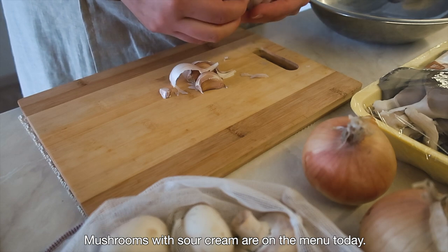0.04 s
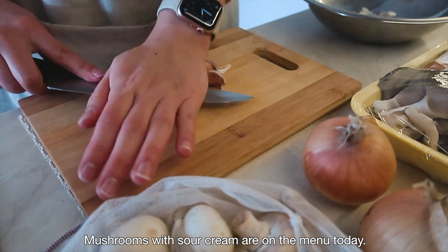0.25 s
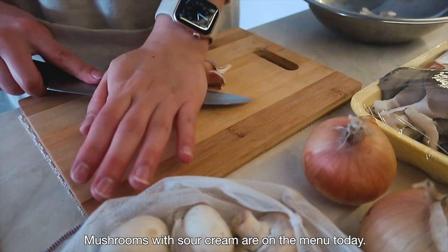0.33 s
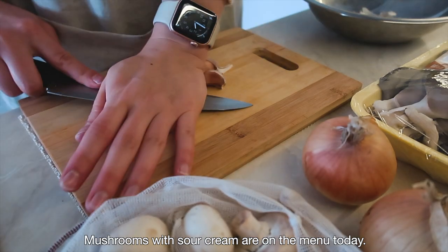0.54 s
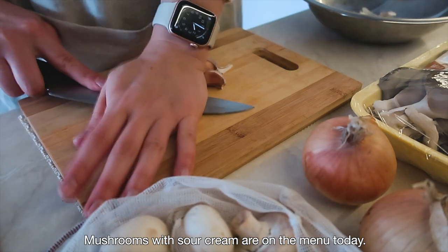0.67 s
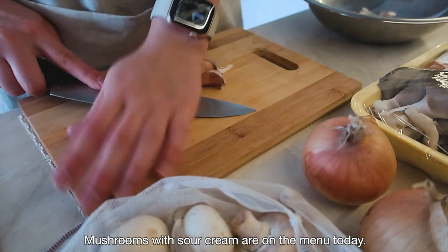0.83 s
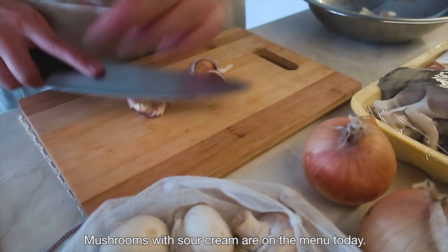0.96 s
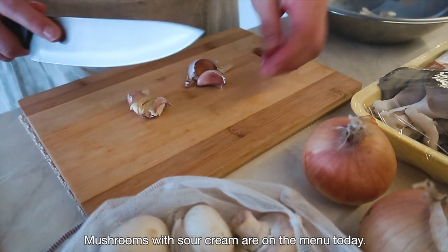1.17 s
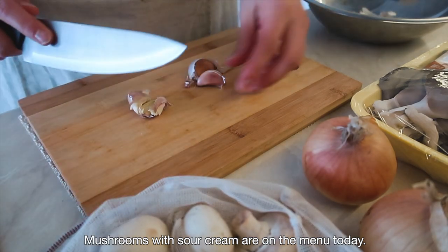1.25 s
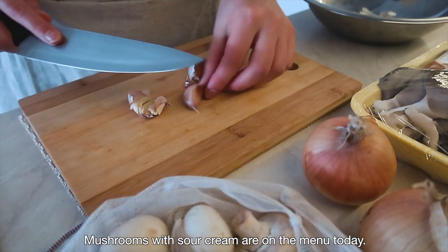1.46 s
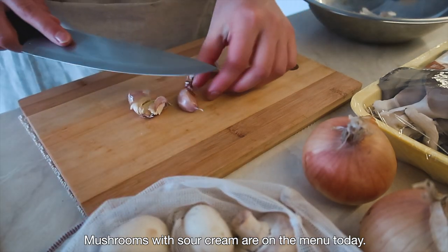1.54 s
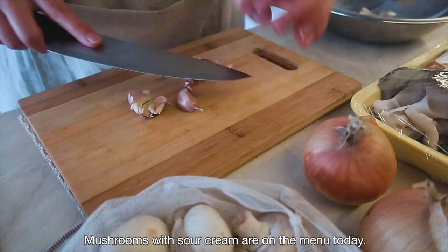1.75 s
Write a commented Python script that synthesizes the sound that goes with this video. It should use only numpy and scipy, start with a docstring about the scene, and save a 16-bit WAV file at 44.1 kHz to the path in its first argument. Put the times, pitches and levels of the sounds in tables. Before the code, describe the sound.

A knife crushes a garlic clove on a wooden board, its dry skin snapping.

```python
"""A low hum in a quiet kitchen, cut by one short dropout; a knife meets a garlic clove with a soft knock.
The hand leans on the flat of the blade and the dry skin crackles and snaps, each snap exciting the wooden
board. The clove gives way and the blade slaps down: the board rings and the counter thuds beneath it.
Later the next clove slides over the board, tiny slips rubbing the resonances of the wood."""
import sys
import numpy as np
from scipy import signal
from scipy.fft import rfft, irfft
from scipy.io import wavfile
from scipy.ndimage import uniform_filter1d, map_coordinates

SR = 44100
rng = np.random.default_rng(int(sys.argv[2]) if len(sys.argv) > 2 else 0)


def wav_out(sig):
    """Save sig, one row per channel (or a flat mono array), as 16-bit PCM at SR to the path in sys.argv[1]."""
    wavfile.write(sys.argv[1], SR, np.round(np.clip(np.atleast_2d(sig).T, -1, 1) * 32767).astype(np.int16))


N = 79380
TIME = np.arange(N) / SR


def amp(db):
    """Decibels to gain."""
    return 10 ** (np.asarray(db) / 20)


def fade(t, t60):
    """A decay that falls 60 dB in t60 seconds."""
    return amp(-60 * t / t60)


def unit_rms(x):
    """Scales to rms 1."""
    return x / np.sqrt(np.mean(x ** 2) + 1e-20)


def unit_energy(x):
    """Scales to energy 1."""
    return x / np.sqrt(np.sum(x ** 2) + 1e-20)


def curve_at(points, hz):
    """Reads a curve over log frequency."""
    f, value = np.transpose(points)
    return np.interp(np.log(hz + 1), np.log(f), value)


def automation(points):
    """Draws straight ramps between points in time."""
    return np.interp(TIME, *np.transpose(points))


def add(mix, start_s, sound):
    """Lays a sound into the mix."""
    part = mix[round(start_s * SR):][:len(sound)]
    part += sound[:len(part)]


def through(x, response):
    """Passes a sound through an impulse response."""
    return signal.fftconvolve(x, response)[:len(x)]


def low_cut(x, hz, order):
    """Rolls off the bass."""
    return signal.sosfilt(signal.butter(order, hz, "high", fs=SR, output="sos"), x)


def stereo(spectra, correlation):
    """Blends two unrelated spectra into a left and right of the given correlation."""
    (a, b), same = spectra, np.clip(correlation, -1, 1)
    return np.array([a, same * a + np.sqrt(1 - same ** 2) * b])


def click(eq, pitch=1, size=2048):
    """A sharp minimum-phase click coloured by an EQ curve."""
    hz = abs(np.fft.fftfreq(size, 1 / SR))
    log_gain = np.log(amp(curve_at(eq, hz / pitch)))
    spectrum = np.exp(np.conj(signal.hilbert(log_gain)))
    return unit_energy(np.fft.ifft(spectrum).real)


def ring(modes, pitch=1):
    """The dying modes of a struck body."""
    t = TIME[:SR // 2]
    partials = (amp(db) * fade(t, t60) * np.sin(2 * np.pi * hz * pitch * t) for hz, db, t60 in modes)
    return unit_energy(sum(partials))


def grains(per_s, spread_db=4.3):
    """Random tiny impulses, a few of them large."""
    size = amp(spread_db * np.minimum(rng.exponential(1, N), 4))
    return unit_rms(size * rng.choice([-1, 1], N) * (rng.random(N) < per_s / SR))


# colour of the room tone: freq_hz, gain_db
ROOM_TONE_EQ = [(20, -10), (45, -1.5), (70, -5), (130, 2.5), (170, -7.5), (220, -3), (400, -9), (1000, -14),
                (2000, -19.5), (4000, -25), (8000, -34.5), (12000, -42), (15000, -50)]
# stereo image of the room tone: freq_hz, correlation
ROOM_TONE_IMAGE = [(60, 0.4), (130, 1), (290, 0.05), (630, 0), (3000, -.15), (15000, -.1)]

def room_tone(level_db=-62):
    """A soft, dark bed of noise, wide in the treble."""
    hz = np.fft.rfftfreq(N, 1 / SR)
    noise = stereo(rfft(rng.standard_normal((2, N))), curve_at(ROOM_TONE_IMAGE, hz))
    return amp(level_db) * unit_rms(irfft(noise * amp(curve_at(ROOM_TONE_EQ, hz)), N))


# drift of the hum: time_s, pitch_hz, level_db
HUM_DRIFT = [(0, 72, -51.5), (.2, 72, -53), (.35, 71.5, -52), (0.602, 72, -54), (.75, 71.5, -61),
             (1.0, 71.5, -57), (1.2, 72, -55.5), (1.5, 72, -52.5), (1.8, 72, -51.5)]

def appliance_hum(third_harmonic_db=-17):
    """A low tone with a faint third harmonic, slightly to the left."""
    time_s, pitch_hz, level_db = np.transpose(HUM_DRIFT)
    phase = 2 * np.pi * np.cumsum(np.interp(TIME, time_s, pitch_hz)) / SR
    tone = np.sin(phase) + amp(third_harmonic_db) * np.sin(3 * phase)
    return np.sqrt(2) * amp(np.interp(TIME, time_s, level_db)) * tone * amp([[.6], [-.6]])


# the resonances dip as the clove is pressed down: time_s, pitch_ratio
WOOD_BEND = [(1.40, 1.018), (1.43, 0.95), (1.51, 1.0), (1.561, 0.98)]

def wood_noise(resonances, grains_per_s=900, steady_s=.012):
    """Tiny impulses blurred by the resonances of the wood, each resonance held at an even level."""
    hz, drive, noise = np.fft.rfftfreq(N, 1 / SR), rfft(grains(grains_per_s)), np.zeros(N)
    for centre_hz, width_hz, db in resonances:
        tone = signal.hilbert(irfft(drive / (1 + 1j * (hz - centre_hz) / width_hz) ** 2, N))
        envelope = uniform_filter1d(abs(tone), round(steady_s * SR))
        noise += amp(db) * unit_rms(tone.real / (envelope + 1e-12))
    playhead = np.cumsum(automation(WOOD_BEND))
    return unit_rms(map_coordinates(noise, [playhead], order=3, mode="wrap"))


# low and high resonances of the wood: centre_hz, width_hz, gain_db
WOOD_LOWS = [(212.4, 11.4, -4.5), (590.6, 42, 1.5)]
WOOD_HIGHS = [(853, 88, 4), (907, 30, -17.5), (1290, 62, -2.5), (2170, 570, -8), (3180, 250, -13)]
# the opening knock's tail, then two slides:
# start_s, level_db, rise_s, hold_s, release_t60_s, lows_over_highs_db
TAIL_AND_SLIDE_CUES = [(0.115, -55.5, 0.0014, 0.0027, 0.43, -8.5), (1.384, -51, 0.023, 0.0067, 0.13, 3),
                       (1.45, -55, 0.02, 0.062, 0.11, 3)]

def knock_tail_and_slides():
    """The noisy tail of the opening knock dying away, then the clove's two slides over the board."""
    lows, highs, out = wood_noise(WOOD_LOWS), wood_noise(WOOD_HIGHS), np.zeros(N)
    for start_s, db, rise_s, hold_s, release_s, lows_db in TAIL_AND_SLIDE_CUES:
        age = TIME - start_s
        envelope = np.clip(age / rise_s, 0, 1) * fade(np.maximum(age - rise_s - hold_s, 0), release_s)
        blend = (highs + amp(lows_db) * lows) / np.hypot(1, amp(lows_db))
        out += amp(db) * envelope * blend
    return out


# hollow ring of knife on clove: pitch_hz, gain_db, t60_s
TOUCH_MODES = [(135.3, 0.5, 0.42), (548, -17.5, .2), (827.6, -5, 0.14), (922.5, -2, 0.1), (966, -7, 0.093),
               (1320, -19, 0.33)]

def knife_touch(start_s=.1195, level_db=-20.5):
    """The opening knock: the knife is laid against the clove with a short hollow ring."""
    out = np.zeros(N)
    add(out, start_s, amp(level_db) * ring(TOUCH_MODES))
    return out


# ring of the board with the blade on it, and of the counter below: pitch_hz, gain_db, t60_s
BOARD_MODES = [(205.5, -7.5, 0.31), (600.4, 2, 0.1), (830.3, 2.5, 0.072), (908, 3, 0.017),
               (1015.5, -2.5, 0.1), (1194.5, 9.5, 0.07), (1324, -7.5, 0.11), (1651, -1, 0.086),
               (1970, -7, 0.16), (2445, -4.5, 0.14), (2683, -19, 0.079), (3118, -5.5, 0.06)]
COUNTER_MODES = [(64, -5.5, 0.4), (100.1, 1.5, 0.22), (127, 0.5, 0.3), (166, -2.5, .06), (225.4, 4, 0.1),
                 (269.4, -9, 0.23), (342, -5.5, 0.29)]
# colour of the blade's clack: freq_hz, gain_db
CLACK_EQ = [(80, -14), (400, -11), (570, 6), (710, -12.5), (950, 3), (1500, -2), (2200, -0.5),
            (3500, -11.5), (4800, -5), (6500, -17), (9000, -45), (15000, -38)]
# blade hits on the board: start_s, ring_db, clack_db, thud_db
BLADE_HITS = [(0.7375, -9, -14, -35), (0.7409, -19.5, -9.5, -25), (0.7428, -15, -9.5, -4),
              (0.7467, -45, -21.5, -21.5), (0.7573, -27, -20, -23), (.774, -25, -34, -29.5)]

def blade_on_board(skin_push, slap_s=.0017):
    """The blade clacks down and the counter thuds; the board rings from these hits and the skin's push."""
    slap = np.exp(-TIME[:2048] / slap_s)  # the blade lands along its length
    rings, clacks, thuds = np.zeros((3, N))
    for start_s, ring_db, clack_db, thud_db in BLADE_HITS:
        add(rings, start_s, amp([ring_db]))
        add(clacks, start_s, amp(clack_db) * unit_energy(rng.standard_normal(len(slap)) * slap))
        add(thuds, start_s, amp([thud_db]))
    rings += low_cut(skin_push, hz=816, order=3)  # the light skin barely moves the low modes
    wood = through(rings, ring(BOARD_MODES)) + through(thuds, ring(COUNTER_MODES))
    return wood + through(clacks, click(CLACK_EQ))


# swell of the fine crackle: time_s, level_db
CRACKLE_LEVEL = [(0, -60), (.082, -61.5), (.12, -71.5), (.3, -69), (0.377, -62), (.41, -55.5),
                 (.465, -50.5), (.492, -57.5), (0.513, -42), (0.529, -62.5), (0.557, -48), (0.572, -46.5),
                 (0.608, -49.5), (0.659, -53), (.70, -60.5), (0.736, -46), (.80, -61.5), (1.0, -73.5),
                 (1.148, -98)]
# its papery colour: freq_hz, gain_db
CRACKLE_EQ = [(80, 9), (250, 1), (900, -12.5), (1700, 0), (2600, 1), (4200, -2.5), (6000, -7),
              (8000, -21.5), (11000, -37), (15000, -46)]

def skin_crackle(to_board_db=-21):
    """The dry skin crackles in tiny grains; returns the sound and its push on the board."""
    cracks = grains(per_s=1400) * amp(automation(CRACKLE_LEVEL))
    return through(cracks, click(CRACKLE_EQ)), amp(to_board_db) * cracks


# ring of the split skin against the blade: pitch_hz, gain_db, t60_s
SKIN_MODES = [(2640, 3.5, 0.016), (2487, -12, 0.045), (3200, -4.5, 0.0083), (3892, -5, 0.019),
              (5500, -16, 0.004)]
# colour of a snap's sharp attack: freq_hz, gain_db
ATTACK_EQ = [(60, -28), (220, -16), (600, -15), (1200, -23), (2000, -3.5), (2600, 8.5), (3300, -1),
             (4400, -13), (5600, -1.5), (8000, -22), (10500, -47), (15000, -32)]
# snaps of the skin: start_s, level_db, pitch_ratio, splinter_s, to_board_db, treble_db
SNAP_CUES = [(0.325, -34.5, 1.55, .001, -7, -18), (0.3917, -12, 1.003, 0.00038, -19, -8.5),
             (0.3930, -16.5, 1.46, 0.00021, -5.5, -10.5), (0.434, -22, 0.93, 0.0007, -14.5, -1),
             (0.4552, -11.5, 1.04, 0.0008, -6, -2), (.506, -17, 0.58, 0.0028, -12, -8),
             (.511, -24.5, 0.66, 0.0026, -21, -7), (0.516, -26.5, 1.1, 0.0022, -19, 10),
             (0.5416, -28.5, 0.93, 0.0011, -25, 6), (0.569, -16.5, 0.9, 0.0045, -16, 8),
             (0.571, -11, 0.95, 0.002, -24, 9.5), (0.5747, -4.5, .97, 0.00064, -8, -6.5),
             (0.58, -8.5, 1.2, 0.0006, 1, -5.5), (0.582, -15, 1.2, .0012, -5, 2),
             (0.593, -14.5, 1.0, 0.0005, -28, -4), (0.6434, -18, 0.98, .0008, -17, -4),
             (.6585, -22.5, 0.8, .0015, 0, 0), (0.7211, -20, 1.026, 0.00074, -7, -6.5),
             (.9582, -43, 0.77, 0.0013, -6, -2), (0.9835, -40, 1.03, 0.0027, -22, 9),
             (1.057, -39.5, 0.98, 0.003, -20, 4), (1.088, -45.5, 0.78, .0012, -7, 4)]

def skin_snaps(attack_db=5.5, treble_hz=5380, splinter_gain_per_s=280):
    """The skin breaks in snaps with trailing splinters; returns the sound and its push on the board."""
    t = TIME[:2048]
    sound, push = np.zeros((2, N))
    for start_s, db, pitch, splinter_s, to_board_db, treble_db in SNAP_CUES:
        splinters = rng.standard_normal(len(t)) ** 3 * t * np.exp(-t / splinter_s)  # cubed: spiky
        fracture = splinter_gain_per_s * splinter_s * unit_energy(splinters)
        fracture[0] = 1  # the break itself
        snap = ring(SKIN_MODES, pitch)[:len(t)] + amp(attack_db) * click(ATTACK_EQ, pitch)
        shelf = click([(treble_hz / 2, 0), (treble_hz * 2, 2 * treble_db)])
        add(sound, start_s, amp(db) * unit_energy(through(fracture, through(snap, shelf))))
        add(push, start_s, amp([db + to_board_db]))
    return sound, push


# decay of the reverb: freq_hz, t60_s
REVERB_DECAY = [(80, 0.72), (250, 0.28), (1000, 0.5), (2500, 0.61), (5000, 0.38), (12000, 0.17)]
# reverb against the direct sound: freq_hz, gain_db
REVERB_EQ = [(80, -13), (250, -6.5), (1000, -7.5), (2500, -10.5), (5000, -14.5), (12000, -27)]
# stereo image of the reverb: freq_hz, correlation
REVERB_IMAGE = [(60, .995), (130, 1), (290, 0.97), (630, 0.88), (1400, 0.43), (3000, -.2), (15000, -.2)]

def reverb_spectrum(hz, build_s=.022):
    """The tail of a small room: noise that builds up, then dies at its own rate in each band."""
    band_hz, time_s, bands = signal.stft(rng.standard_normal((2, N)), SR, nperseg=256)
    t60 = curve_at(REVERB_DECAY, band_hz)[:, None]
    equal_energy = np.sqrt(2 * np.log(1000) / (t60 * SR))
    tail = signal.istft(bands * fade(time_s, t60) * equal_energy, SR, nperseg=256)[1][:, :N]
    tail *= np.minimum(TIME / build_s, 1)
    return stereo(rfft(tail, 2 * N), curve_at(REVERB_IMAGE, hz)) * amp(curve_at(REVERB_EQ, hz))


# the board sits to the right: freq_hz, left_minus_right_db
BOARD_PAN = [(60, -2.5), (200, -1.5), (370, -2.5), (690, -9), (1270, -8.5), (2340, -6), (4300, -1.5),
             (8000, 0.5), (15000, -2)]
# phase between the sides: freq_hz, left_lead_rad
BOARD_PHASE = [(30, 0), (690, -.15), (1550, -1.3), (2600, -1.7), (3800, -2.0), (4900, -2.2), (6700, -2.8),
               (9000, -2.8), (13000, -2.1)]
# stereo image of the early reflections: freq_hz, correlation
EARLY_IMAGE = [(300, 0.67), (2500, 0.65), (5000, 0.75), (10000, 0.2)]

def kitchen(x, early_db=-7.5, early_t60_s=.039):
    """Direct sound from the right, early reflections off hand, counter and bowls, then the reverb."""
    hz = np.fft.rfftfreq(2 * N, 1 / SR)
    scatter = rng.standard_normal((2, N)) * (TIME > .002) * fade(TIME, early_t60_s)
    early = stereo(rfft([unit_energy(side) for side in scatter], 2 * N), curve_at(EARLY_IMAGE, hz))
    pan = amp(np.outer([.5, -.5], curve_at(BOARD_PAN, hz)))
    phase_shift = np.exp(1j * np.outer([1, 0], curve_at(BOARD_PHASE, hz)))
    close = pan * phase_shift * (1 + amp(early_db) * early)
    tail = reverb_spectrum(hz) * pan ** .96
    source = rfft(low_cut(x, hz=57, order=4), 2 * N)
    return irfft(source * (close + tail))[:, :N]


def scene():
    """Garlic, knife and board in the kitchen, over hum and room tone."""
    snaps, snap_push = skin_snaps()
    crackle, crackle_push = skin_crackle()
    crush = snaps + crackle + blade_on_board(snap_push + crackle_push)
    return kitchen(knife_touch() + crush + knock_tail_and_slides()) + appliance_hum() + room_tone()


def record(dry):
    """The sound drops out for 34 ms near the start, and the very top of the treble is cut."""
    gate = (TIME < .084) | (TIME > .118)
    high_cut = signal.firwin(255, cutoff=15200, window=("kaiser", 9), fs=SR)
    return signal.oaconvolve(dry * gate, high_cut[None], "same")


dry = scene()
out = record(dry)
wav_out(out)
```